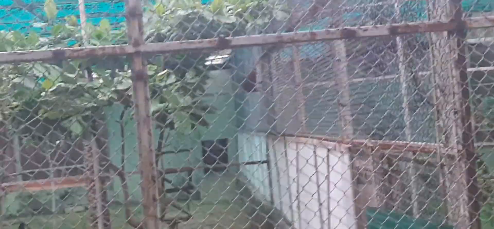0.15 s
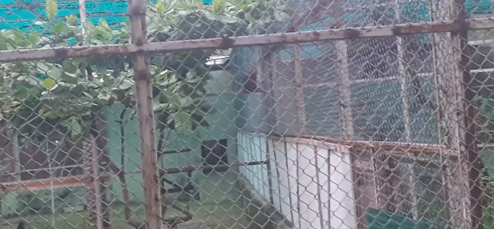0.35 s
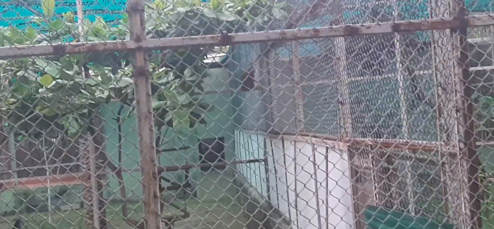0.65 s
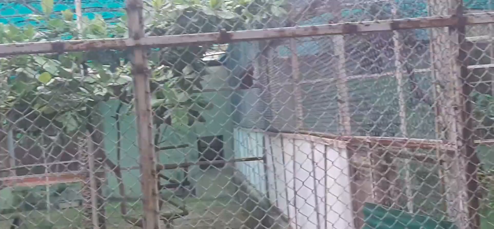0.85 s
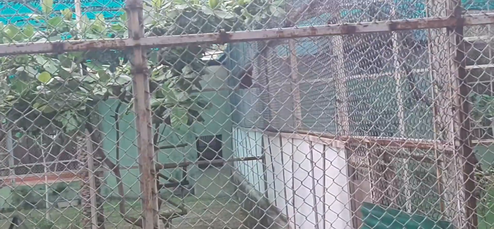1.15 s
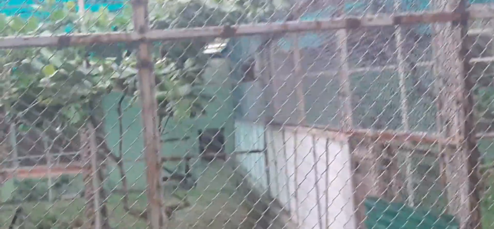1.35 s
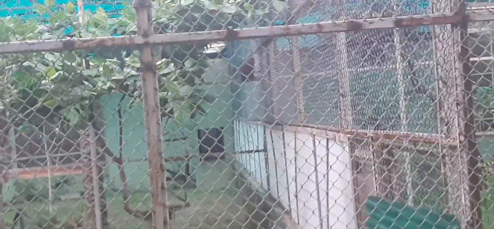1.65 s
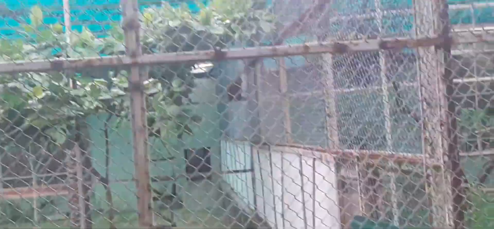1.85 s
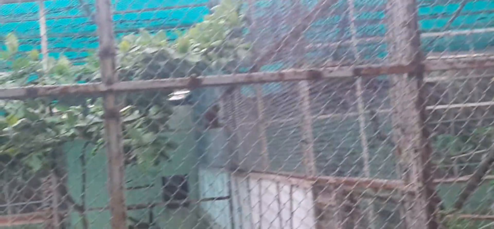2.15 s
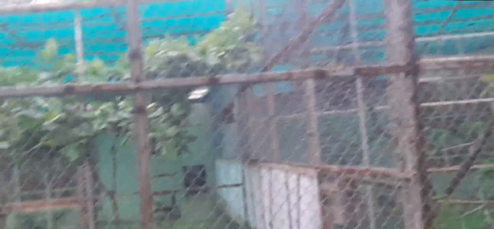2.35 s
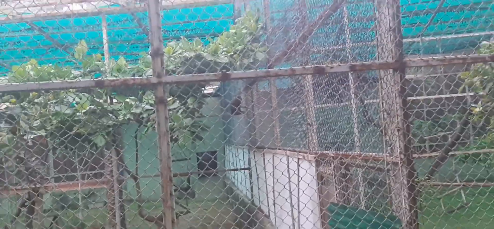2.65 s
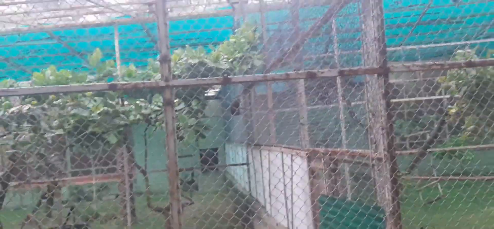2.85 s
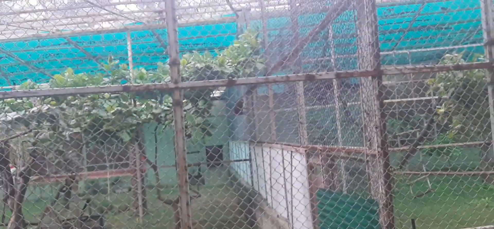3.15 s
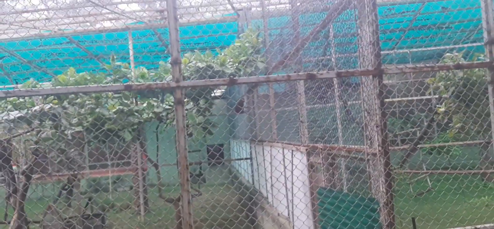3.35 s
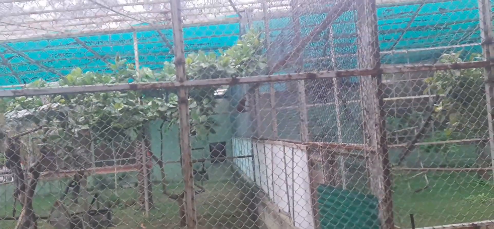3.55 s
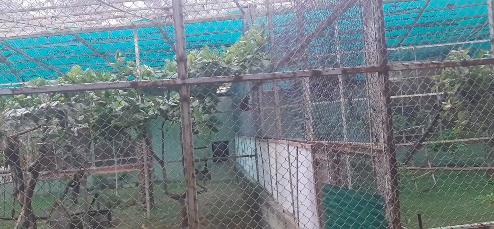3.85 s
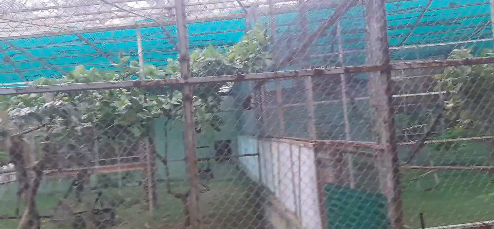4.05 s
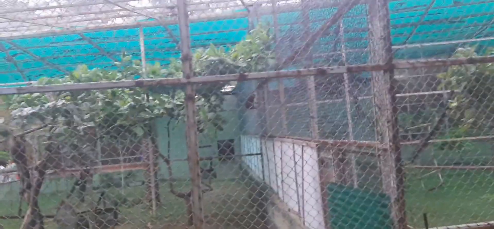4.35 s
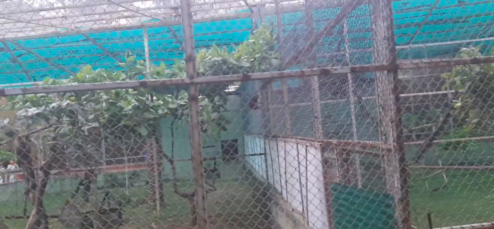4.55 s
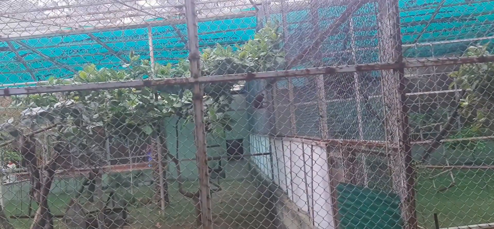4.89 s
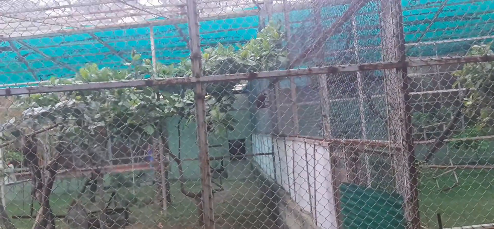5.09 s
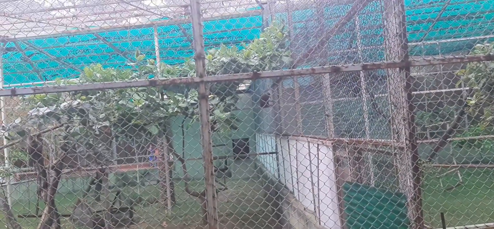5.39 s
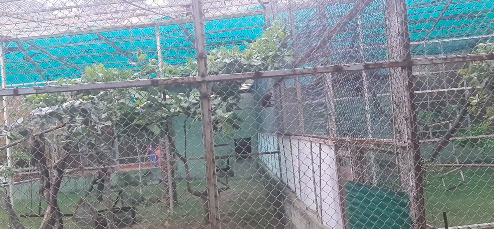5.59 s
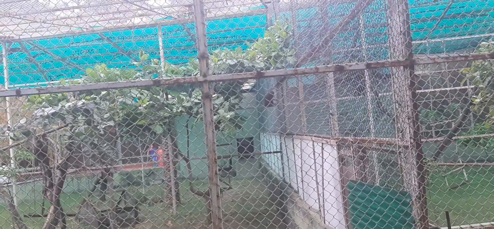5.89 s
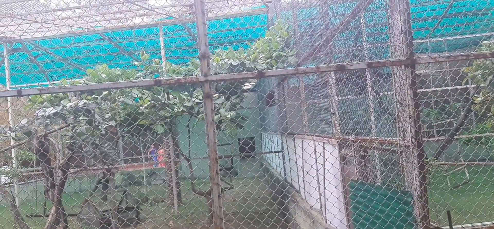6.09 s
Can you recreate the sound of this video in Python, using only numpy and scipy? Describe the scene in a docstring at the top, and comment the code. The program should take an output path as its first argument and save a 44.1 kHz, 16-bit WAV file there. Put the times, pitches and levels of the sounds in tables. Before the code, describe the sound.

In a walled outdoor aviary, a peafowl near the microphone gives five short, loud, harsh honks, pauses for about a second and a half, then gives a soft rising call and four more honks, the first three run together. Small birds chirp hoarsely, whistle and coo faintly further away, with a few soft ticks over a quiet outdoor rumble. A fast pitch warble runs through the whole sound.

```python
"""A peafowl honks close to the microphone, nine times, in a walled outdoor aviary.
Each honk is a round hoot from the syrinx that, pushed hard, breaks into a rasping, nasal blare
and sinks back; the walls add a faint ring. Further off, small birds chirp and whistle and others coo,
among short, soft ticks and a low outdoor rumble. A peafowl also gives one soft rising call.
The whole scene warbles in pitch twenty times a second."""
import sys
import numpy as np
from scipy import signal
from scipy.fft import rfft, irfft, next_fast_len
from scipy.io import wavfile
from scipy.ndimage import uniform_filter1d, map_coordinates

SR = 44100
rng = np.random.default_rng(int(sys.argv[2]) if len(sys.argv) > 2 else 0)


def generate_wav(signal):
    """Clip the signal to [-1, 1] and save it as 16-bit WAV at the path in sys.argv[1]."""
    frames = np.transpose(np.atleast_2d(signal))
    scaled = np.clip(frames, -1, 1) * 32767
    pcm = np.round(scaled).astype(np.int16)
    wavfile.write(sys.argv[1], SR, pcm)


N = 274610
TIME = np.arange(N) / SR


def from_db(db):
    """Decibels to gain."""
    return 10 ** (np.asarray(db) / 20)


def rms_one(x):
    """Scale to unit power."""
    return x / np.sqrt(np.mean(x ** 2) + 1e-20)


def in_time(rows):
    """One curve over time for each level column of a table."""
    times, *columns = np.transpose(rows)
    return [np.interp(TIME, times, column) for column in columns]


def ramp(elapsed, length):
    """Rise from 0 to 1 over a given time."""
    return np.clip(elapsed / length, 0, 1)


def gain_at(spectrum, hz):
    """Read a spectrum as a gain."""
    freqs, levels = np.transpose(spectrum)
    return from_db(np.interp(np.log(hz + 1), np.log(freqs), levels))


def noise(spectrum, size=N):
    """Coloured noise, unrelated left and right."""
    white = rfft(rng.standard_normal((2, 2 * next_fast_len(size // 2 + 1))))
    hz = np.linspace(0, SR / 2, white.shape[1])
    return rms_one(irfft(white * gain_at(spectrum, hz))[:, :size])


def drift(hz, size=N):
    """Random wander up to a given rate, spread 1."""
    white = rng.standard_normal(size + SR // 2)
    slow = signal.sosfilt(signal.butter(4, hz, fs=SR, output="sos"), white)
    return rms_one(slow[-size:])


def split(x, hz):
    """The parts below and above a frequency."""
    low = signal.sosfiltfilt(signal.butter(4, hz, fs=SR, output="sos"), x)
    return low, x - low


def scatter(x, t60):
    """Dense reflections that die away, different on each side of the microphone; power is kept."""
    decay = from_db(-60 * TIME[:SR] / t60)
    echoes = (rng.standard_normal((2, SR)) * decay)[:, :int(t60 * SR)]
    echoes /= np.sqrt(np.sum(echoes ** 2, axis=1, keepdims=True))
    return signal.oaconvolve(np.atleast_2d(x), echoes, axes=1)[:, :x.shape[-1]]


def evened(x, span_s):
    """Hold the slow level at 1 and keep the fast flutter."""
    power = uniform_filter1d(x ** 2, max(int(span_s * SR), 2), axis=-1)
    return x / np.sqrt(np.maximum(power, 1e-12))


# Colour of the open air, before each band gets its own level: (frequency [Hz], density [dB])
OUTDOOR_SPECTRUM = [(20, -28.5), (60, -3.5), (125, 2.5), (200, -7), (320, -11.5), (600, -13.5),
                    (1000, -19.5), (2000, -21.5), (3200, -26.5), (6000, -30), (8000, -30), (11000, -36),
                    (16000, -43)]
# Rumble around the aviary: (time [s], level below 82 Hz [dB], level from 82 to 330 Hz [dB])
RUMBLE_LEVELS = [(.35, -77.5, -56.5), (1.1, -71, -53), (2.2, -58, -52), (2.85, -54, -55), (3.7, -62, -54),
                 (4.4, -56, -51), (5.25, -58.5, -57), (6.2, -60, -55)]


def outdoors(air_db=-58, lumpy_db=3.5):
    """The bed of the place: a lumpy low rumble under thin, even air, all around the microphone."""
    deep_db, low_db = in_time(RUMBLE_LEVELS)
    rumble, air = split(noise(OUTDOOR_SPECTRUM), hz=330)
    deep, low = split(rumble, hz=82)
    lumps = from_db(low_db + lumpy_db * drift(15)) * rms_one(low)
    return from_db(deep_db) * rms_one(deep) + lumps + from_db(air_db) * rms_one(air)


# Short, soft ticks: (peak time [s], rise and fall time constant [s], peak level [dB])
TICKS = [(1.057, .04, -53), (2.909, 0.0086, -54), (3.643, 0.0076, -41), (4.63, 0.0078, -26.5),
         (5.196, 0.014, -29.5), (6.16, 0.007, -51)]
# Their bright colour: (frequency [Hz], density [dB])
TICK_SPECTRUM = [(1500, -28.5), (5000, -1), (9000, -4.5), (16000, -5)]


def ticks():
    """Short, soft, bright ticks, each a sharp peak of noise."""
    envelope = sum(from_db(level_db) * np.exp(-np.minimum(np.abs(TIME - peak) / fade_s, 30))
                   for peak, fade_s, level_db in TICKS)
    return envelope * noise(TICK_SPECTRUM)


def overtones(pitch, throat, harmonics):
    """Harmonics of a moving pitch, weighted by a fixed throat."""
    phase = 2 * np.pi * np.cumsum(pitch) / SR
    return sum(gain_at(throat, k * pitch) * (k * pitch < SR / 2) * np.sin(k * phase)
               for k in range(1, harmonics + 1))


def glides(notes, throat, waver, waver_hz, harmonics):
    """Short bird notes that swell and fade while their pitch slides and wavers."""
    out = np.zeros(N + SR)
    for start, length, first_hz, last_hz, level_db in notes:
        size, at = int(length * SR), int(start * SR)
        pitch = np.linspace(first_hz, last_hz, size) * (1 + waver * drift(waver_hz, size))
        note = overtones(pitch, throat, harmonics) * signal.windows.tukey(size, .7)
        out[at:at + size] += from_db(level_db) * rms_one(note)
    return out[:N]


# A small bird, well off the microphone, repeats one falling chirp: (time [s], relative level [dB])
FAR_CHIRPS = [(.44, -55.5), (1.0, -52), (2.945, -52.5), (3.37, -46), (3.628, -44.5), (3.745, -52),
              (3.88, -43.5), (4.84, -49), (5.335, -49.5), (5.74, -52.5), (5.96, -48)]
# Thin whistles and soft coos; at 4.09 s, a soft rising peafowl call with its overtone:
# (time [s], length [s], first pitch [Hz], last pitch [Hz], relative level [dB])
WHISTLE_NOTES = [(1.12, 0.34, 5090, 4446, -65), (1.28, 0.17, 4900, 2980, -61), (1.3, 0.37, 2050, 1757, -65),
                 (2.83, 0.32, 7900, 6730, -64), (3.08, 0.42, 6800, 5660, -64.5),
                 (4.09, 0.05, 3057, 3450, -42.5)]
COO_NOTES = [(.315, 0.044, 447.1, 328, -52), (2.95, 0.072, 936, 804, -50), (3.295, 0.05, 450, 437, -45.5),
             (4.0, 0.11, 391, 460, -52.5), (4.09, 0.079, 472, 545, -45), (5.78, 0.193, 1018, 1103, -56),
             (5.85, 0.32, 1394, 1686, -60.5), (5.92, 0.12, 1095, 774, -48.5)]
# Throats for the high notes and for the low ones: (frequency [Hz], gain [dB])
HIGH_THROAT = [(1500, -18), (3100, 2.5), (4700, 1), (6300, 4), (8000, -4.5), (9600, -9.5), (13000, -30)]
LOW_THROAT = [(400, 17), (1000, -10.5), (1600, -21.5), (3000, -27)]


def far_birds(chirp_s=.05, chirp_first_hz=1715, chirp_last_hz=1452):
    """Distant voices reach the microphone by reflection; a fast waver makes the chirps hoarse."""
    notes = [(start, chirp_s, chirp_first_hz, chirp_last_hz, db) for start, db in FAR_CHIRPS]
    chirps = glides(notes, HIGH_THROAT, waver=.05, waver_hz=700, harmonics=7)
    whistles = glides(WHISTLE_NOTES, HIGH_THROAT, waver=.0434, waver_hz=594, harmonics=1)
    coos = glides(COO_NOTES, LOW_THROAT, waver=.058, waver_hz=150, harmonics=2)
    early = from_db(1) * scatter(chirps + whistles + coos, t60=.022)
    chirp_tail = from_db(-.5) * scatter(chirps, t60=.9)
    soft_tail = from_db(-4) * scatter(whistles + coos, t60=.87)
    return early + chirp_tail + soft_tail


def aviary(voice, blur_hz=450, bright_db=7):
    """The walls return a faint ring, brighter than the voice, part of it blurred into a breathy wash."""
    body, treble = split(voice, hz=4200)
    thrown = body + from_db(bright_db) * treble
    ring = scatter(thrown, t60=.34)
    wash = scatter(thrown * drift(blur_hz), t60=.81)
    return from_db(-21.5) * ring + from_db(-31) * wash


def partial(phase, shimmer, direct, wall_t60=.069, shimmer_hz=150):
    """One harmonic of a harsh voice: its strength shakes, near walls make it flutter; level 1."""
    strength = 1 + shimmer * drift(shimmer_hz, len(phase))
    # the direct sound reaches left and right a quarter cycle apart
    straight = strength * np.sin(phase + np.array([[0], [np.pi / 2]]))
    return evened(direct * straight + scatter(straight[0], wall_t60), span_s=.04)


def push(t, start, attack, climax, let_go, end, first_hz, settled_hz, sag,
         hoot_db, blare_db, nasal_db, treble_db):
    """The bird pushes hard, then lets go and sinks to a plain hoot: pitch and four levels in dB."""
    release_s, treble_lag_s, hoot_edge_s = .038, .0086, .024
    slack_hz, nasal_sag_db_per_s = 682, 117
    slack = (1 - ramp(t - start, attack)) ** 2.44
    released = ramp(t - let_go, release_s)
    from_climax = np.abs(t - climax)
    held_hz = first_hz + (settled_hz - first_hz) * ramp(t - start, 2.05 * attack)
    pitch = held_hz + (slack_hz - held_hz) * released
    # the hoot swells, gives way as the blare builds, returns on letting go, then dies
    at_edge = 1 - ramp(np.minimum(t - start, end - t), hoot_edge_s)
    hoot = hoot_db - 10 * at_edge - 9.5 * ramp(t - start, let_go - start) + 8 * released
    # the upper registers start low and drop on letting go; the treble holds on a little longer
    blare = blare_db - 27 * slack - sag * from_climax - 27 * released ** 1.22
    nasal = nasal_db - 13 * slack - nasal_sag_db_per_s * from_climax - 16.5 * released
    treble = treble_db - 22 * slack - 21.5 * ramp(t - let_go - treble_lag_s, release_s)
    return pitch, hoot, blare, nasal, treble


# The peafowl's throat, heard from close by: (frequency [Hz], gain [dB])
PEAFOWL_THROAT = [(2000, -17), (2400, -10), (2800, -1.5), (3200, 1.5), (3550, 0), (4000, -17),
                  (4900, -12.5), (5600, -29.5), (6400, -22.5), (7200, -26), (8200, -41), (12000, -61)]
# Rasp of its air stream, and a thin hiss on top: (frequency [Hz], density [dB])
RASP_SPECTRUM = [(400, -24), (1000, -26.5), (1600, -18), (1950, -20), (2400, 3), (3100, -3), (4000, -1),
                 (5500, 0.5), (6500, 0.5), (8200, -17.5), (11000, -26), (13000, -12), (16000, -17.5)]
HISS_SPECTRUM = [(7500, -41), (8900, -3), (10300, -2), (11800, -39)]


def honk(pitch, hoot_db, blare_db, nasal_db, treble_db, side_db, rough_db, hiss_db, rasp_db=-17):
    """The syrinx hoots at its fundamental; pushed hard it buzzes and the throat rings near 3 kHz."""
    size = len(pitch)
    # no two cycles are equally long, so the high harmonics blur into noise
    jitter = .013 * from_db(rough_db) * drift(190, size)
    phase = 2 * np.pi * np.cumsum(pitch * (1 + jitter)) / SR
    buzz = sum(gain_at(PEAFOWL_THROAT, k * pitch) * partial(k * phase, shimmer=.35, direct=.2)
               for k in range(3, 11))
    # air escapes in one puff each cycle
    rasp = noise(RASP_SPECTRUM, size) * (1 + .4 * np.cos(phase)) * from_db(rasp_db + rough_db)
    blare, treble = split(buzz + rasp, hz=4430)
    cry = from_db(blare_db) * evened(blare, span_s=.036)
    cry += from_db(treble_db) * evened(treble, span_s=.03)
    cry += from_db(nasal_db) * partial(2 * phase, shimmer=.33, direct=1.1)
    cry += from_db(blare_db + hiss_db) * noise(HISS_SPECTRUM, size)
    cry *= from_db(side_db * np.array([[.5], [-.5]]))
    return cry + from_db(hoot_db) * partial(phase, shimmer=.18, direct=1.4)


# The peafowl, near the microphone and a little to the right, one honk a row:
# (start [s], attack length [s], climax [s], let-go [s], end [s], first pitch [Hz], settled pitch [Hz],
#  blare sag either side of the climax [dB/s], base levels of hoot, blare, nasal band and treble [dB],
#  left over right [dB], roughness [dB], hiss relative to blare [dB])
NEAR_HONKS = [(.006, .05, .125, .246, .318, 735, 812, 29.5, -28, -12.7, -31, -27.5, -1.5, 2, -34.5),
              (.702, 0.094, .86, 0.92, .985, 690, 814, 57, -30, -14.5, -40, -31, -1, 1.5, -21),
              (1.632, 0.047, 1.692, 1.744, 1.803, 675, 775.4, 95, -23.5, -22.5, -40, -32.5, -1, 3.5, -47),
              (1.841, .028, 1.978, 2.037, 2.083, 775, 809, 81.5, -23.5, -15.5, -29, -30, -2.5, 3.5, -56.5),
              (2.471, 0.09, 2.656, 2.697, 2.738, 684, 830, 64.5, -27.5, -13.5, -36.5, -30.5, -2, 2, -41.5),
              (4.19, 0.029, 4.25, 4.263, 4.292, 640, 784, 60, -28.5, -33.5, -48.5, -48.5, -2, 7, -35),
              (4.29, .072, 4.368, 4.405, 4.432, 614.2, 735.7, 28, -23.5, -15, -30, -30.5, -1.5, 7, -48),
              (4.44, .098, 4.585, 4.641, 4.688, 849.7, 802.4, 36.5, -23.5, -12.3, -26.5, -29.5, -1.5, .5, -43),
              (4.976, 0.065, 5.13, 5.18, 5.218, 675.3, 862.7, 38, -25, -16.5, -24.5, -32, -.5, 1, -52.5)]


def peafowl(edge_s=.015):
    """The bird shifts between honks, so each meets reflections of its own."""
    out, margin = np.zeros((2, N)), SR // 20
    for start, attack, climax, let_go, end, *voice, side_db, rough_db, hiss_db in NEAR_HONKS:
        span = slice(max(int(start * SR) - margin, 0), int(end * SR) + margin)
        t = TIME[span]
        gate = np.clip(np.minimum(t - start, end - t) / edge_s + .5, 0, 1)
        pitch, *levels = push(t, start, attack, climax, let_go, end, *voice)
        out[:, span] += gate ** 2 * honk(pitch, *levels, side_db, rough_db, hiss_db)
    return out


def scene():
    """At the microphone: the near bird, its faint ring in the aviary, and everything further off."""
    honks = peafowl()
    return honks + aviary(honks) + far_birds() + ticks() + outdoors()


def record(dry):
    """A swinging delay makes everything warble in pitch; the highest treble is cut."""
    warble_hz, pitch_depth, cutoff_hz = 20, .072, 15850
    swing = 2 * np.pi * warble_hz
    position = (TIME + pitch_depth / swing * np.sin(swing * TIME)) * SR
    warbled = np.array([map_coordinates(side, [position], order=3, mode="nearest") for side in dry])
    return signal.sosfilt(signal.ellip(12, .1, 90, cutoff_hz, fs=SR, output="sos"), warbled)


dry = scene()
out = record(dry)
generate_wav(out)
```